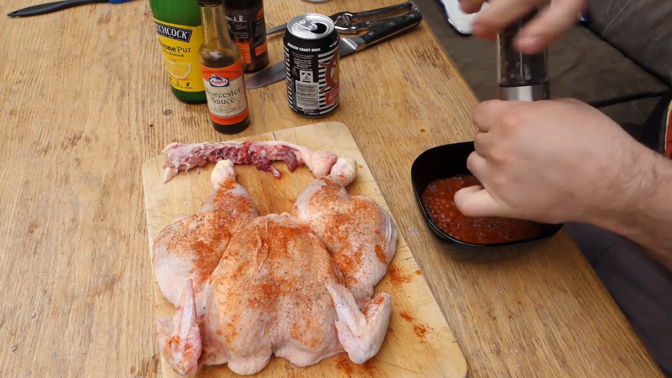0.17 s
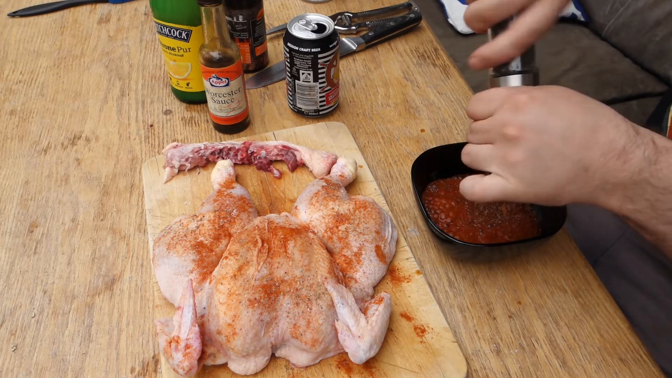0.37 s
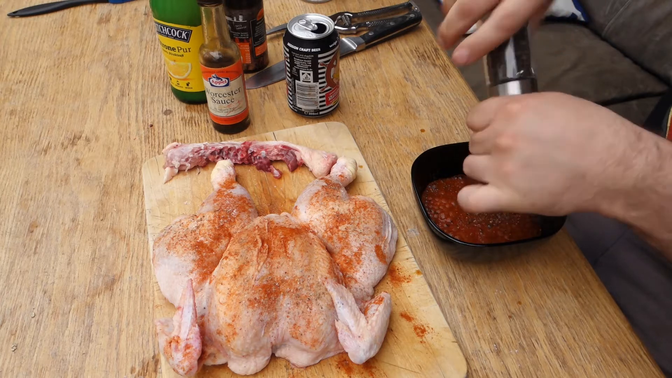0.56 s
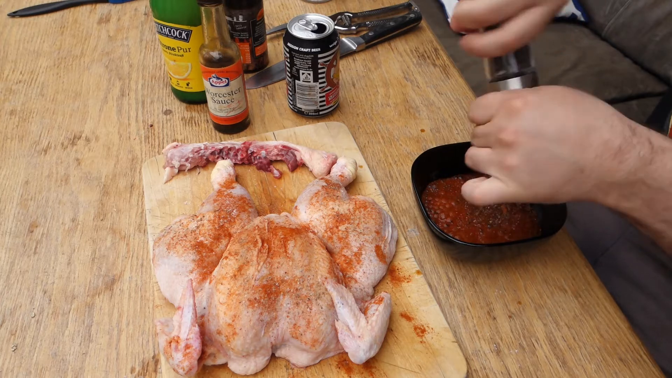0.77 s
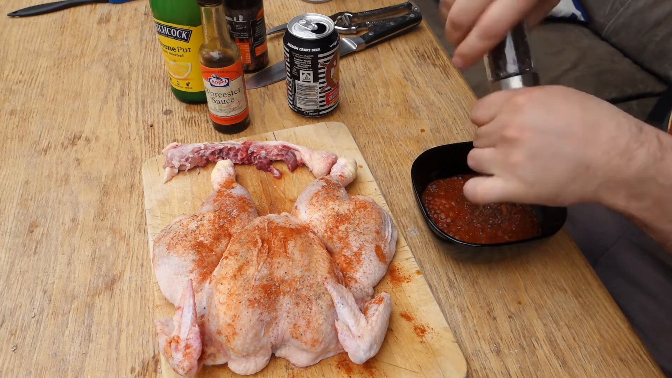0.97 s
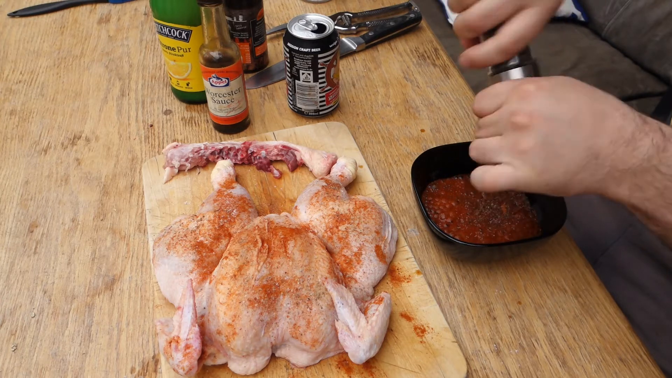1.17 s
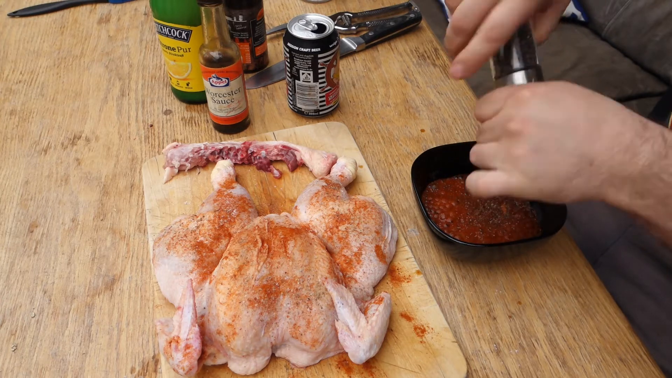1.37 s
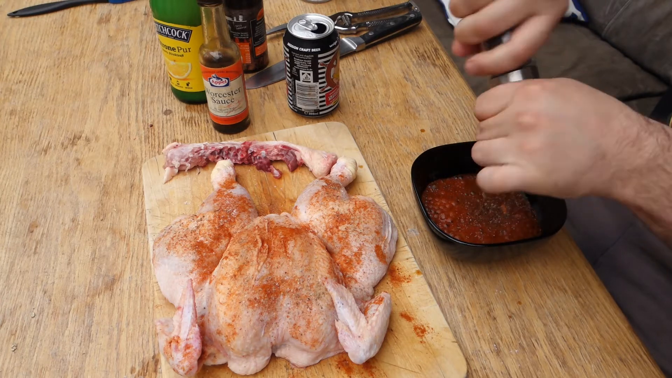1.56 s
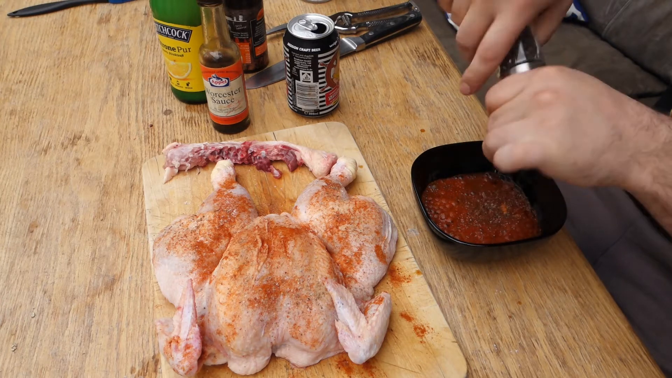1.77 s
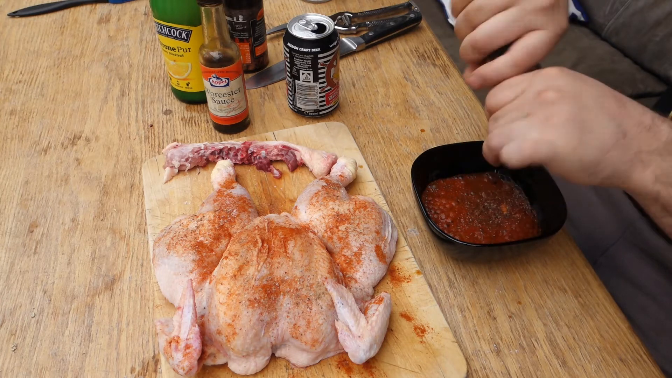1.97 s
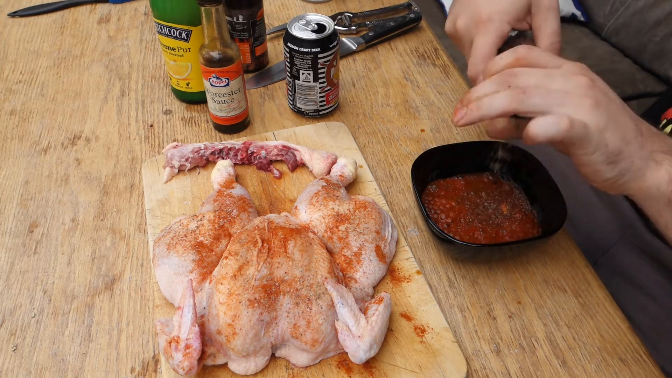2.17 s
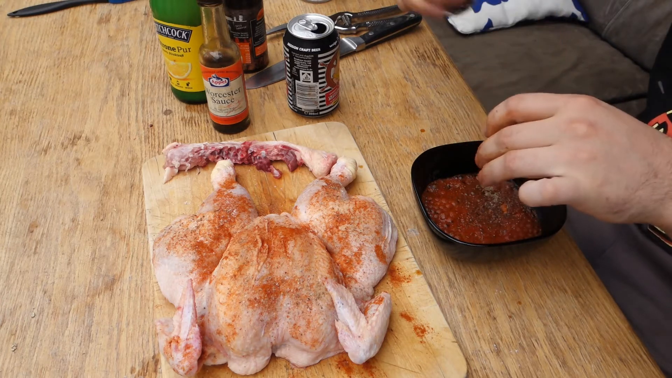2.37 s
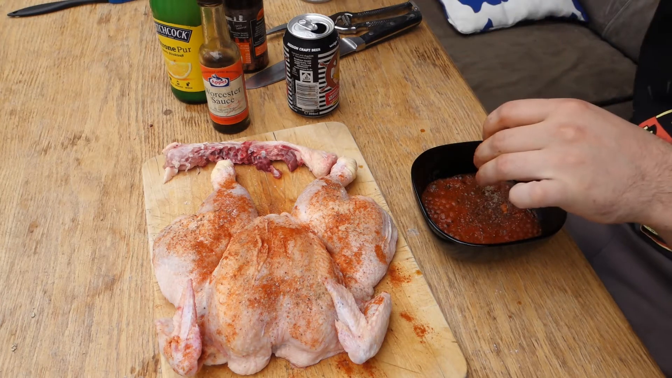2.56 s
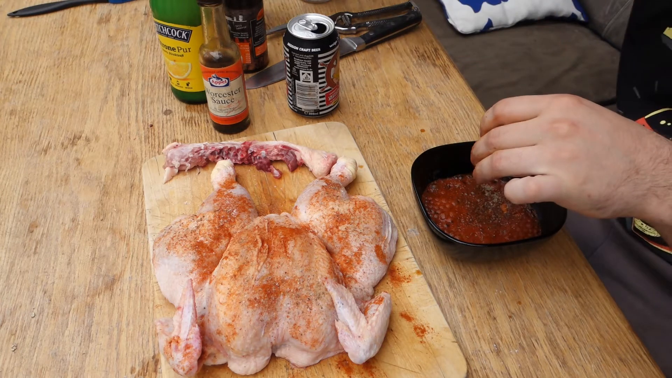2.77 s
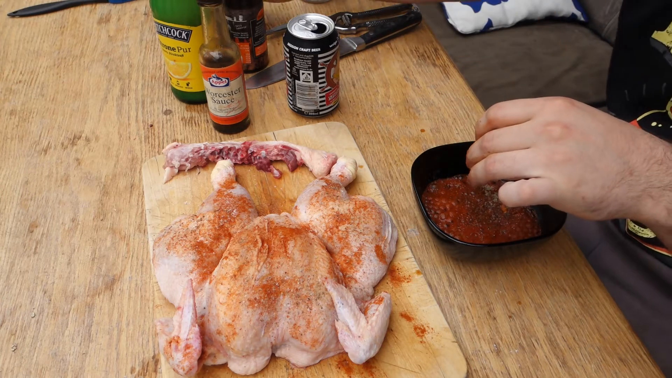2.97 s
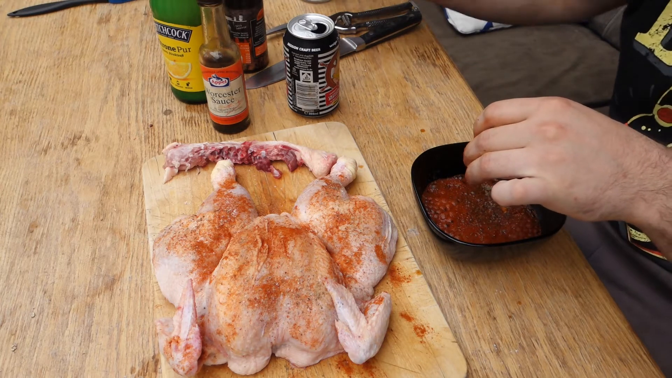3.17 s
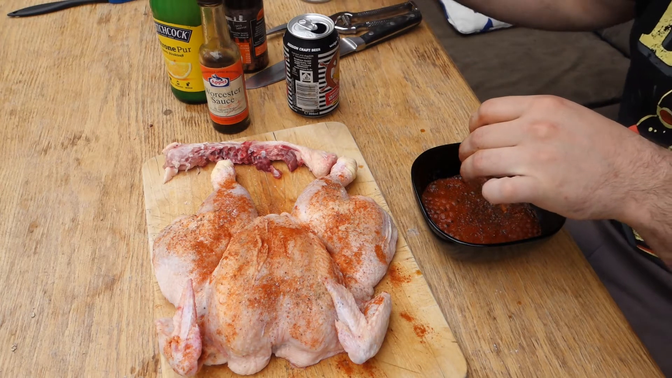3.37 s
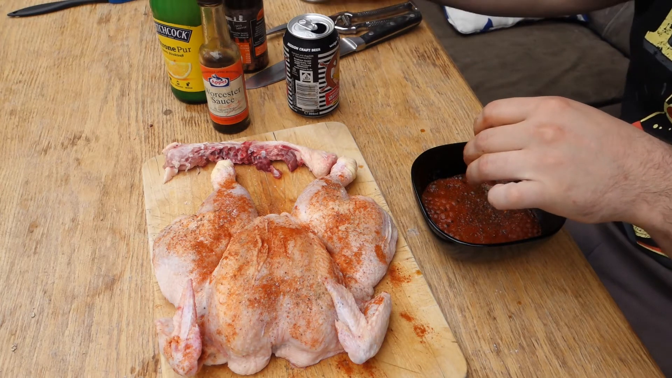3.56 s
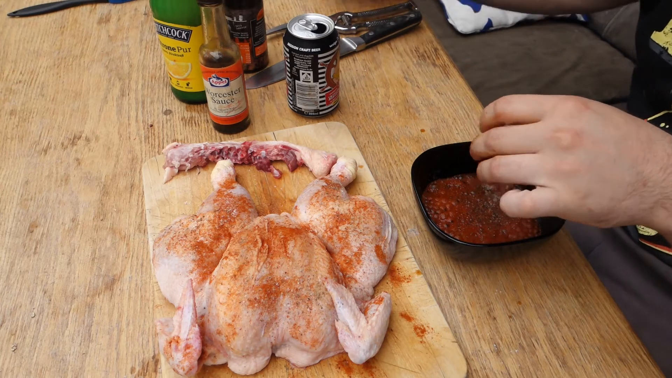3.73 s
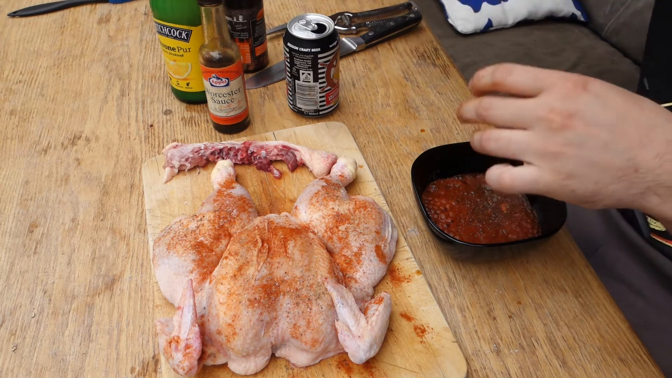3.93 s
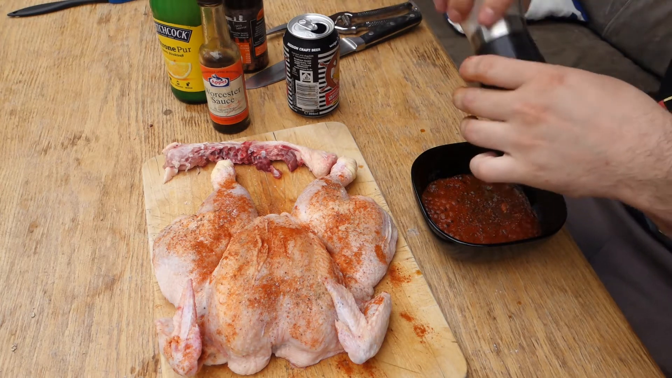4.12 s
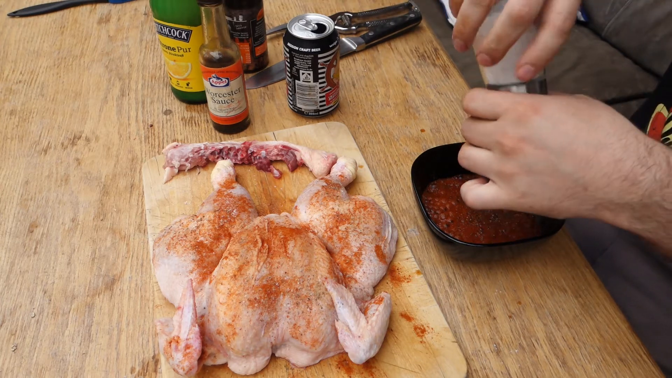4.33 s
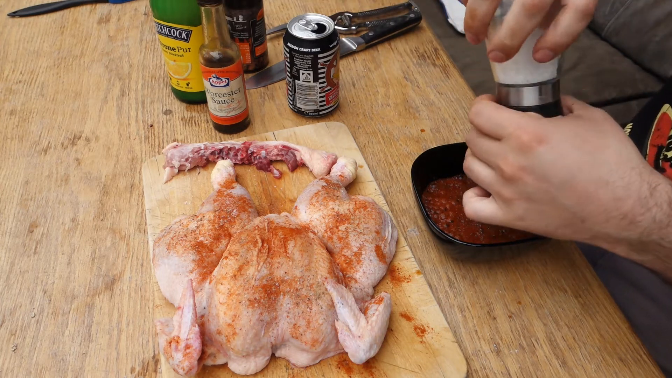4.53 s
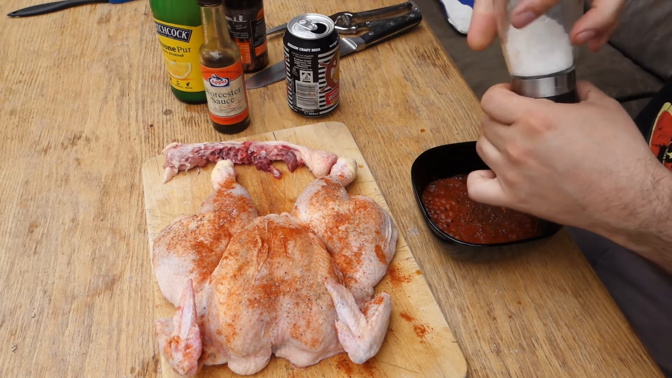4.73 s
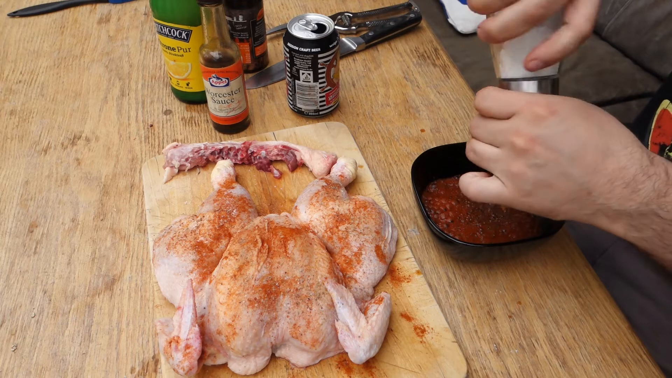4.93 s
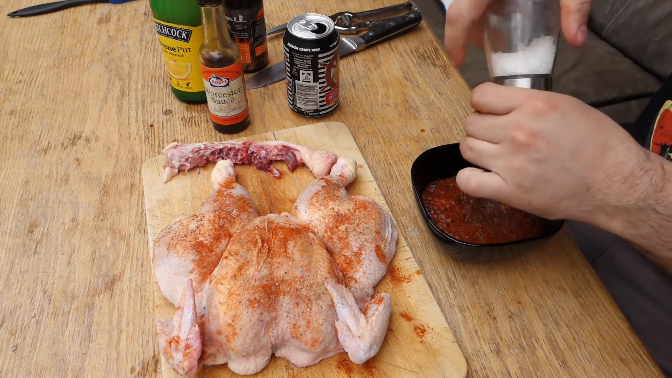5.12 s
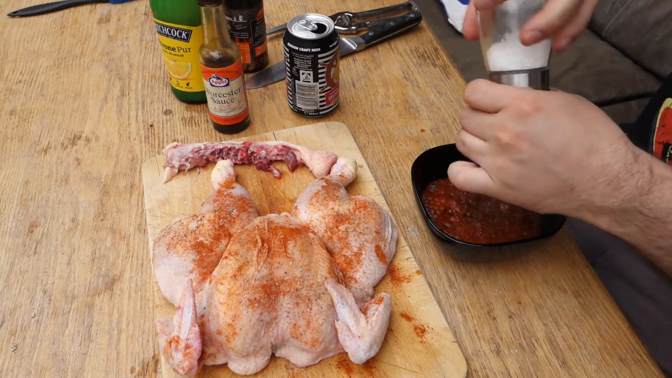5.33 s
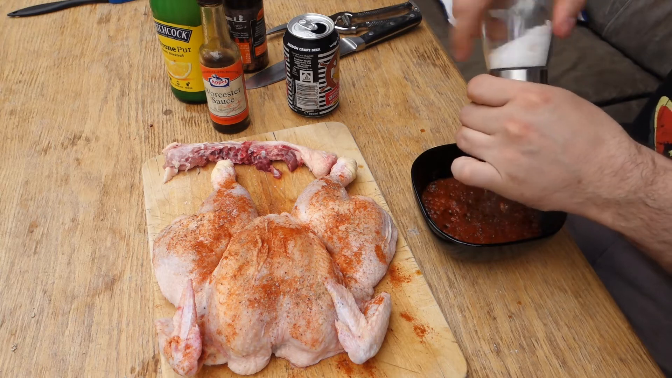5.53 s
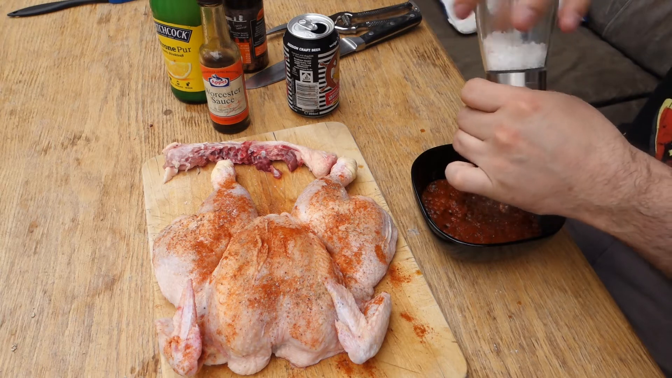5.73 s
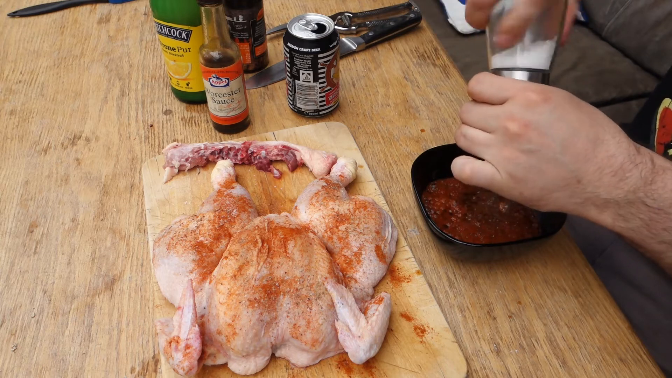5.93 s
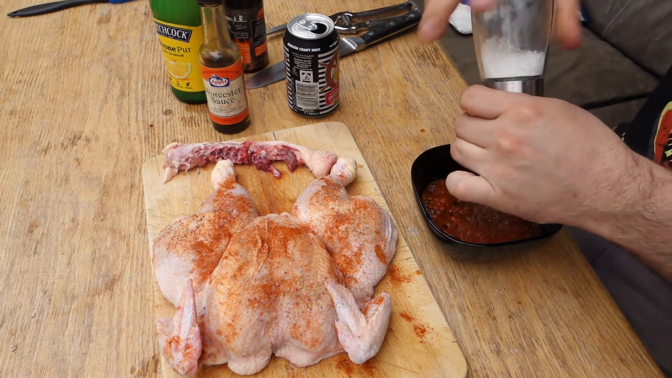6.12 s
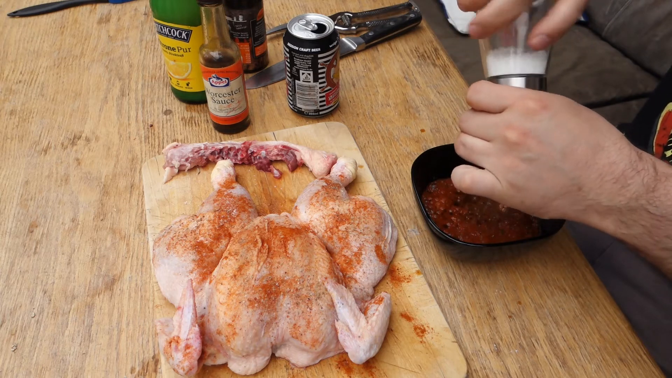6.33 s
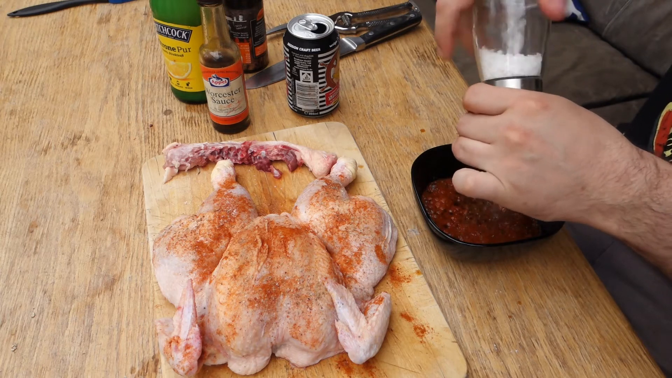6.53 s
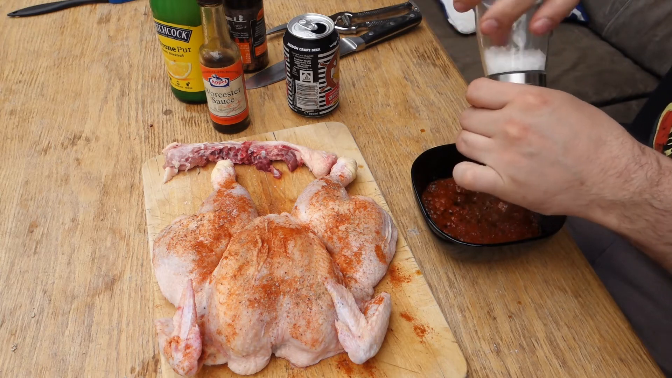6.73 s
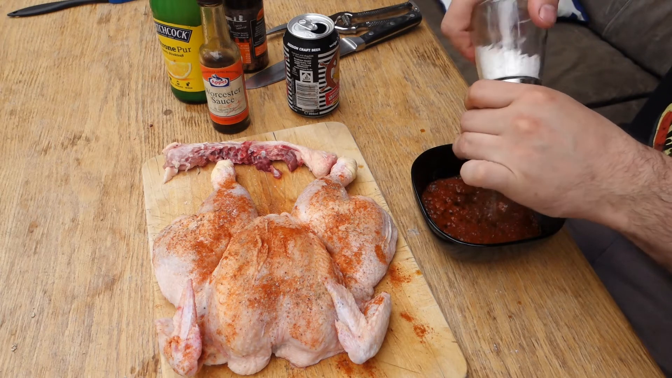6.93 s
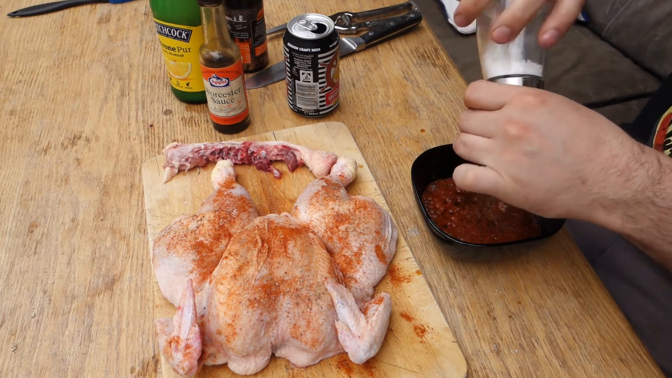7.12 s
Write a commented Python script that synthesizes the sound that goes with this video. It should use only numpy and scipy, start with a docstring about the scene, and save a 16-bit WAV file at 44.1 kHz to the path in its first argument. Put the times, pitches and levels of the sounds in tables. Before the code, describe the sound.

Close, dry grinding of peppercorns with glassy ticks, a cluster of wooden thuds, then heavier, crisper salt grinding in a small quiet room.

```python
"""Over steady hiss and a distant appliance's hum, a glass pepper mill is twisted by hand over a bowl, at right.
Its burr crushes corns (noise grains ringing resonances); loose corns tumble and tick on the glass; a room answers.
From 2.9 s a mill knocks on a wooden table: short noise puffs through the modes of table and foot.
From 3.9 s a salt mill slides, crunches and sings likewise; at 7.1 s it squeaks and the table is touched.
Table levels are relative: each source's gains and those of scene() come after."""
import sys
import numpy as np
from scipy import signal
from scipy.fft import rfft, irfft, next_fast_len
from scipy.io import wavfile
from scipy.ndimage import map_coordinates

SR = 44100
rng = np.random.default_rng(int(sys.argv[2]) if len(sys.argv) > 2 else 0)


def waveform_to_disk(signal):
    """Save audio, clipped to [-1, 1], as 16-bit WAV at the path in sys.argv[1]."""
    frames = np.transpose(np.atleast_2d(signal))
    scaled = np.clip(frames, -1, 1) * 32767
    samples = np.round(scaled).astype(np.int16)
    wavfile.write(sys.argv[1], SR, samples)


def gain_from_db(level_db):
    """Convert decibel levels to linear amplitude factors (20 dB per decade)."""
    decades = np.asarray(level_db, float) / 20
    return 10 ** decades


N = 317079  # samples


def along(points, hz):
    """Interpolates (Hz, value) points on a log frequency axis."""
    f, v = np.transpose(points)
    return np.interp(np.log(hz + 1), np.log(f + 1), v)


def filtered(x, response):
    """Applies a complex frequency response to x, zero-padded."""
    m = 2 * next_fast_len(N // 2 + SR // 4)
    return irfft(rfft(x, m) * response(np.fft.rfftfreq(m, 1 / SR)), m)[..., :N]


def above(hz, order):
    """Causal high-pass: equal one-pole sections in series."""
    return lambda f: (1j * f / (hz + 1j * f)) ** order


def modes(table):
    """Causal response of parallel resonances, alternating in sign."""
    def response(f):
        total = 0
        for k, (centre, width, db) in enumerate(table):
            resonance = 1j * f * width / (centre * centre - f * f + 1j * f * width)
            total = total + (-1) ** k * gain_from_db(db) * resonance
        return total
    return response


def colour(spectrum):
    """Causal minimum-phase response with the given spectrum, by folding the cepstrum."""
    def response(f):
        cepstrum = irfft(np.log(gain_from_db(along(spectrum, f)) + 1e-6))
        half = len(cepstrum) // 2
        cepstrum[1:half] *= 2
        cepstrum[half + 1:] = 0
        return np.exp(rfft(cepstrum))
    return response


def levelled(x, lo_hz, hi_hz):
    """Scales x to rms 1 within a band."""
    return x / np.std(filtered(x, lambda f: (f > lo_hz) & (f < hi_hz)))


def wobble(rate_hz):
    """Smooth random curve with rate_hz knots a second."""
    return map_coordinates(rng.standard_normal(N // 100), [np.arange(N) * rate_hz / SR])


def pair(alike, count):
    """Two noises whose correlation depends on frequency."""
    turn = lambda f: np.arccos(np.clip(along(alike, f), -1, 1)) / 2
    mid_side = lambda f: [np.cos(turn(f)), np.sin(turn(f))]
    mid, side = filtered(rng.standard_normal((2, N)), mid_side)
    return np.array([mid + side, mid - side])[:, :count]


def grains(rate_hz, spread_db, dust):
    """Random impacts, a few much larger than the rest, over fine dust noise."""
    when, size, fine = rng.random(N), rng.exponential(size=N), rng.standard_normal(N)
    hits = (when < rate_hz / SR) * gain_from_db(spread_db * np.minimum(size, 3.1)) * np.sign(fine)
    return hits / np.std(hits) + dust * rng.standard_normal(N)


def crushed(table, lo_hz, hi_hz, rate_hz, spread_db, dust, sway_db, sway_hz):
    """Grains ring resonances; as the grains shift, each resonance swells and fades on its own."""
    hits = grains(rate_hz, spread_db, dust)
    rings = 0
    for k, mode in enumerate(table):
        swaying = hits * gain_from_db(sway_db * wobble(sway_hz))
        rings = rings + (-1) ** k * filtered(swaying, modes([mode]))
    return levelled(rings, lo_hz, hi_hz)


def strokes(rows, peak_db, swell_db, shape):
    """Gain per sample: each stroke sets in, swells to its peak, holds, is released and trickles out.

    shape: (attack [dB/s], release [dB/s], trickle against peak [dB], trickle release [dB/s])."""
    attack, release, trickle_db, fade = shape
    start, climb, hold = np.transpose(rows)[:3, :, None]
    peak_db, swell_db = np.reshape(peak_db, (-1, 1)), np.reshape(swell_db, (-1, 1))
    t = np.arange(0, N + 32, 32) / SR
    rise = np.clip((t - start) / np.maximum(climb, 1e-3), 0, 1)
    late = np.maximum(t - start - climb - hold, 0)
    level = peak_db - swell_db * (1 - rise) - attack * np.maximum(start - t, 0)
    tail = gain_from_db(-release * late) + gain_from_db(trickle_db - fade * late)
    gain = (gain_from_db(level) * tail).sum(axis=0)
    return np.interp(np.arange(N) / SR, t, gain)


def twisted(twists, shape, *stirs):
    """Gains of the crunch, then of each stirred layer: (level against crunch [dB], share of its swell)."""
    peak_db, swell_db = np.transpose(twists)[3:5]
    return [strokes(twists, peak_db + db, share * swell_db, shape) for db, share in [(0, 1), *stirs]]


def bursts(times, levels_db, t60, count, hz=0, ring=0):
    """A short decaying puff at each time: noise plus a share of sine at the given pitches."""
    t = np.arange(count) / SR
    tone = np.sin(2 * np.pi * np.outer(hz, t))
    puffs = (rng.standard_normal((len(times), count)) + ring * tone) * gain_from_db(-60 * t / t60)
    puffs *= gain_from_db(levels_db)[:, None] / np.abs(puffs).max(axis=1, keepdims=True)
    at = np.round(times[:, None] * SR).astype(int) + np.arange(count)
    return np.bincount(at.ravel(), puffs.ravel(), N + count)[:N]


def vary(hz, times, share):
    """One pitch per event, scattered by a relative share."""
    return hz * (1 + share * rng.standard_normal(len(times)))


def struck(puffs, response, gain_db):
    """Puffs through a response scaled to impulse energy 1, then a gain."""
    f = np.fft.rfftfreq(8192, 1 / SR)
    return gain_from_db(gain_db) * filtered(puffs, response) / np.sqrt(np.mean(np.abs(response(f)) ** 2))


# hiss and rumble spectrum: (frequency [Hz], density [dB])
HISS_SPECTRUM = [(24, -63), (40, -16.5), (214, -13), (431, -8), (464, -9), (582, -7), (643, 0), (868, -4),
                 (935, 1), (1010, -6), (1580, -3), (2670, -11), (3610, -11.5), (4880, -14.5), (15800, -18)]
# left-right correlation: (frequency [Hz], correlation [1])
HISS_ALIKE = [(60, 0.51), (180, 0.91), (550, 0.24), (1650, 0.046), (4970, 0.023), (15000, 0.27)]


def hiss():
    """Steady microphone hiss and room rumble: shaped, partly correlated stereo noise."""
    noise = filtered(pair(HISS_ALIKE, count=N), lambda f: gain_from_db(along(HISS_SPECTRUM, f)))
    return gain_from_db(-63) * noise / np.std(noise.mean(axis=0))


# drone bands: (centre [Hz], width [Hz], level [dB])
HUM_MODES = [(793.4, 36, 3), (1657, 37, 2), (2350, 122, -6.5), (3794, 99, -15.5)]


def appliance_hum():
    """A far appliance drones: noise through a few narrow resonances."""
    return gain_from_db(-76) * levelled(filtered(rng.standard_normal(N), modes(HUM_MODES)), 700, 784.0)


# levelling bands of body, grit, glass, rim, cup: (low [Hz], high [Hz])
PEPPER_LEVEL_BANDS = [(1000, 3200), (10300, 14000), (6200, 7600), (14900, 15800), (600, 1400)]
# resonances of body, hollow under the burr, glass wall, rim: (centre [Hz], width [Hz], level [dB])
PEPPER_BODY_MODES = [(1940, 347, 11), (2640, 620, -5.5)]
PEPPER_CUP_MODES = [(713, 390, -0.5), (1210, 530, -1)]
PEPPER_GLASS_MODES = [(6850, 350, 11.5), (7700, 1130, -3.5), (12500, 430, -13)]
PEPPER_RIM_MODES = [(9260, 200, 0), (15400, 350, 0)]
# grit spectrum: (frequency [Hz], density [dB])
PEPPER_GRIT_SPECTRUM = [(1530, -42), (2600, 0), (3140, -26), (4000, -4.5), (6100, -3.5), (7210, -10.5),
                        (8700, 2.5), (9670, -8), (11200, -8.5), (15100, -9.5), (15800, -35)]
# burr twists: (bite [s], climb [s], hold [s], crunch peak [dB], swell from bite to peak [dB],
# glass against crunch [dB], grit against crunch [dB])
PEPPER_TURNS = [(0, 0.0031, 0.0063, -34, -12, -5.5, -13.5), (.344, 0.059, 0.023, -35, 6, -16, -16.5),
                (.767, 0.039, 0.046, -34, 11, -12.5, -15), (.935, 0.028, 0.019, -46, 18, -12, -17),
                (1.12, 0.014, 0.014, -43.5, 8, -18, -12), (1.175, 0.035, 0.05, -34, 7, -19.5, -17.5),
                (1.33, 0.018, 0.011, -54, -1, -2, -12), (1.545, .04, 0.038, -40.5, 8, -35, -21),
                (1.605, 0.007, 0.046, -33, 27, -15, -18), (1.75, 0.011, 0.016, -55, 8, -13, -25),
                (1.925, 0.018, 0.0083, -46.5, 21, -16, -14), (1.957, 0.01, 0.02, -40.5, 4, -20, -22),
                (1.989, 0.0085, 0.06, -34.5, 4, -7.5, -14.5), (2.08, 0.0037, 0.013, -43.5, 3, -17, -9)]
# cup against crunch, twist by twist: (level [dB])
PEPPER_CUP_LEVELS = [-16, -21, -8.5, -8.5, -10, -14, 1.5, -3, -16, -22, -15, -23, -14, -10]
# corns tumble as the mill turns back or tips:
# (start [s], climb [s], hold [s], glass wall level [dB], rim level [dB])
CORN_TUMBLES = [(0.193, 0.045, 0.033, -36, -44.5), (0.302, 0.022, 0.0099, -59, -72),
                (0.52, .02, 0.062, -52, -57), (0.631, 0.029, 0.03, -32.5, -43),
                (1.044, 0.044, 0.013, -34, -41), (1.455, 0.044, 0.013, -32, -44),
                (1.8, 0.018, 0.029, -62, -66), (1.879, 0.039, 0.008, -40, -47),
                (2.35, 0.038, 0.034, -60, -62), (2.404, 0.046, 0.012, -41, -36),
                (2.58, .012, 0.084, -59, -68)]


def pepper_mill():
    """Corns crack in the burr and ring the body; on the back stroke they tumble on glass wall and rim."""
    body_band, grit_band, glass_band, rim_band, cup_band = PEPPER_LEVEL_BANDS
    twist_shape, tumble_shape = (3000, 423, -14, 98), (600, 270, -37, 80)
    tumble_swell_db, tipped_s, upright_rim_db = 24, 2.3, -24

    glass_db, grit_db = np.transpose(PEPPER_TURNS)[5:]
    crunch, grit, stirred, rung, hollow = twisted(
        PEPPER_TURNS, twist_shape,
        (grit_db, -0.066), (glass_db, -0.1), (-22, 0.1), (PEPPER_CUP_LEVELS, 0.8))
    wall_db, rim_db = np.transpose(CORN_TUMBLES)[3:]
    loose = strokes(CORN_TUMBLES, wall_db, tumble_swell_db, tumble_shape)
    tipped = strokes(CORN_TUMBLES, rim_db, tumble_swell_db, tumble_shape)
    crunch = crunch + gain_from_db(-22) * tipped
    grit = grit + gain_from_db(-23.5) * tipped

    body = crushed(PEPPER_BODY_MODES, *body_band, rate_hz=900, spread_db=3.5, dust=0.73,
                   sway_db=2.5, sway_hz=61)
    cup = crushed(PEPPER_CUP_MODES, *cup_band, rate_hz=600, spread_db=2.5, dust=0.57,
                  sway_db=7.5, sway_hz=43)
    fine = grains(2510, spread_db=7.5, dust=1.0)
    fine = levelled(filtered(fine, colour(PEPPER_GRIT_SPECTRUM)), *grit_band)
    corns = grains(450, spread_db=5.0, dust=0.8)
    glass = levelled(filtered(corns, modes(PEPPER_GLASS_MODES)), *glass_band)
    # corns reach the rim's lower mode in full only once the mill is tipped over
    low, high = (filtered(corns, modes([mode])) for mode in PEPPER_RIM_MODES)
    low_gain = np.where(np.arange(N) < tipped_s * SR, gain_from_db(upright_rim_db), 1)
    rim = levelled(low_gain * low - high, *rim_band)
    return crunch * body + hollow * cup + grit * fine + (stirred + loose) * glass + (rung + tipped) * rim


# decay time: (frequency [Hz], t60 [s])
ROOM_DECAY = [(150, 0.33), (500, 0.24), (1200, 0.31), (2500, 0.33), (8000, 0.31), (15000, 0.4)]
# left-right correlation of the tail: (frequency [Hz], correlation [1])
TAIL_ALIKE = [(200, 1), (700, 0.97), (1500, 0.59), (3000, 0.49), (6000, 0.046), (14000, 0.18)]


def room(x, step_s=0.3):
    """Reverberation by decaying noise; the hands keep moving, so each step has a new tail."""
    out, hop, size = np.zeros((2, N + 2 * SR)), round(step_s * SR), SR // 2
    delay = 200  # samples
    noise = pair(TAIL_ALIKE, count=N)
    for a in range(0, N, hop):
        hz, t, z = signal.stft(np.roll(noise, -a, axis=1)[:, :size], SR, nperseg=256)
        decay = gain_from_db(-60 * t / along(ROOM_DECAY, hz)[:, None])
        tail = signal.istft(z * decay, SR, nperseg=256)[1]
        wet = signal.fftconvolve(x[None, a:a + hop], tail / np.linalg.norm(tail[0]), axes=1)
        out[:, a + delay:a + delay + wet.shape[1]] += wet
    return out[:, :N]


# spectrum of a bright tick: (frequency [Hz], density [dB])
TICK_SPECTRUM = [(1500, -17.5), (3500, -9.5), (6800, 0.5), (11000, -12), (16000, -9.5)]
# single grains on the glass: (time [s], peak [dB])
GLASS_TICKS = [(.2344, -40.5), (.276, -32), (.3273, -33), (.3305, -43), (.334, -42), (.4894, -38),
               (.565, -38.5), (.6435, -30.5), (1.0651, -34), (1.0905, -27), (1.1228, -27), (1.4833, -39),
               (1.875, -38), (1.9215, -37), (2.231, -58), (2.361, -48.5), (2.413, -52), (2.589, -38),
               (2.6248, -39), (2.671, -45), (4.102, -37.5), (4.117, -25), (4.155, -36), (4.1702, -39),
               (4.185, -39), (4.2075, -27.5), (4.44, -36), (4.608, -34.5), (4.6349, -39), (5.238, -54.5),
               (6.7234, -34), (6.9913, -34)]


def glass_ticks():
    """Single grains tick on the glass: short ringing puffs near 7.2 kHz."""
    s, db = np.transpose(GLASS_TICKS)
    ticks = bursts(s, db, t60=0.013, count=500, hz=vary(7200, s, 0.066), ring=0.98)
    return struck(ticks, colour(TICK_SPECTRUM), gain_db=3.0)


def crunch_body(puffs):
    """Crunches pass a broad resonance twice."""
    return gain_from_db(4.0) * filtered(puffs, lambda f: modes([(2000, 3000, 0)])(f) ** 2)


# large grains crack in the burr: (time [s], bright tick level [dB], lower crunch level [dB])
BURR_CRACKS = [(0.3445, -15.5, -37), (0.3482, -18, -26), (0.7672, -17.5, -38), (0.7703, -17, -28),
               (0.803, -26, -28), (1.1758, -27, -37), (1.2052, -21.5, -12.5), (1.2507, -40, -14),
               (1.6112, -17, -16), (1.643, -45, -19), (1.9661, -28, -18), (1.9887, -20.5, -18),
               (2.012, -35, -22), (2.028, -22, -23), (1.9955, -24, -21), (2.047, -20.5, -34),
               (2.0805, -17.5, -28), (2.094, -30, -24), (4.8556, -28, -40), (4.8916, -23, -50),
               (4.9161, -14, -20), (4.9295, -17, -21), (4.965, -36, -9.5), (4.9756, -13, -22),
               (5.38, -42, -28), (5.3965, -35, -34), (5.4103, -36, -35), (5.431, -19, -27),
               (5.5159, -30, -14), (5.536, -23, -12), (5.8567, -28, -42), (5.9487, -30, -24),
               (5.9681, -34, -6.5), (6.3205, -29, -48), (6.327, -23, -24), (6.376, -46.5, -10),
               (6.3879, -34.5, -13), (6.4264, -34, -13), (6.781, -33.5, -14), (6.809, -44, -12),
               (6.8369, -40, -10), (6.8447, -37, -13), (6.86, -34, -16), (6.888, -38, -9.5),
               (7.0144, -50, -28)]


def burr_cracks():
    """Large grains crack in the burr: a bright tick plus a short lower crunch."""
    s, tick_db, crunch_db = np.transpose(BURR_CRACKS)
    swap_s, pepper_burr_hz, salt_burr_hz = 3.5, 8200, 5614  # the salt mill takes over at swap_s
    burr_hz = np.where(s < swap_s, pepper_burr_hz, salt_burr_hz)
    ticks = bursts(s, tick_db, t60=0.0075, count=500, hz=vary(burr_hz, s, 0.078), ring=0.97)
    crunch = bursts(s, crunch_db, t60=0.017, count=900, hz=vary(1907, s, 0.041), ring=1.62)
    return struck(ticks, colour(TICK_SPECTRUM), gain_db=3.0) + crunch_body(crunch)


# hollow cracks: (time [s], peak [dB])
HOLLOW_POPS = [(1.3396, -26), (1.5422, -35), (5.0095, -6), (5.3227, -30), (6.9993, -26)]


def hollow_pops():
    """Hollow cracks: strongly pitched puffs near 1 kHz."""
    s, db = np.transpose(HOLLOW_POPS)
    return crunch_body(bursts(s, db, t60=0.017, count=900, hz=vary(1010, s, 0.062), ring=3.4))


# the collar takes up slack: (time [s], peak [dB])
COLLAR_CATCHES = [(1.935, -38), (4.8245, -22), (5.826, -32), (6.273, -22), (6.7341, -24)]
# spectrum of that click: (frequency [Hz], density [dB])
CATCH_SPECTRUM = [(400, -15.5), (900, -3.5), (2000, 4.5), (4500, -7.5), (6000, -17.5), (15000, -25)]


def collar_catches():
    """The collar takes up slack with a dry click: a short coloured noise puff."""
    s, db = np.transpose(COLLAR_CATCHES)
    return struck(bursts(s, db, t60=0.0088, count=400), colour(CATCH_SPECTRUM), gain_db=4.5)


# the foot meets the table:
# (time [s], thud [dB], clack [dB], edge [dB], mean edge pitch [Hz], time between rocks [s])
FOOT_LANDINGS = [(2.932, -14, -15, -19.5, 1610, 0.007), (2.951, -20.5, -19, -18.5, 2440, 0.0081),
                 (2.972, -18.5, -23, -24, 1880, .008), (2.989, -19.5, -26, -19, 2260, .015),
                 (3.1, -28, -37, -45, 1700, .012), (3.131, -18, -35, -22.5, 2260, 0.011),
                 (3.192, -17.5, -34, -36, 2160, 0.01), (3.227, -18.5, -28.5, -31, 2130, .012),
                 (3.6, -54.5, -62, -69, 2020, 0.014), (7.121, -41.5, -50, -50.5, 2000, 0.023)]
# loss per rock of thud, clack, edge: (loss [dB])
ROCK_LOSSES = (3.5, 1.5, 7)
# resonances of table top and mill foot: (centre [Hz], width [Hz], level [dB])
TABLE_MODES = [(140, 45, -9), (288, 108, -11), (427, 106, -3), (536, 97, -1.5), (682, 98, -5.5)]
FOOT_MODES = [(829, 75, -5.5), (1030, 184, -7.5), (1250, 250, -11)]
# spectrum of the dry edge: (frequency [Hz], density [dB])
EDGE_SPECTRUM = [(150, -29), (900, 5.5), (1550, 8), (1850, 6.5), (2200, 1), (2550, 2), (3000, -5.5),
                 (3500, -14), (4400, -16), (8000, -39), (16000, -52)]


def table_knocks():
    """The table top booms under each contact, the mill's foot clacks, with a dry edge on top."""
    lands, *levels, ring_hz, gap = np.transpose(FOOT_LANDINGS)[..., None]
    rock = np.arange(3)  # each landing rocks twice more
    s = (lands + gap * rock).ravel()
    thud_db, clack_db, edge_db = ((db - loss * rock).ravel() for db, loss in zip(levels, ROCK_LOSSES))
    edge_hz = vary((ring_hz + 0 * rock).ravel(), s, 0.047)
    soft_contact = lambda f: modes(TABLE_MODES)(f) / (1 + 1j * f / 1490) ** 2
    thud = struck(bursts(s, thud_db, t60=0.015, count=1500), soft_contact, gain_db=12.5)
    clack = struck(bursts(s, clack_db, t60=0.025, count=1500), modes(FOOT_MODES), gain_db=10.5)
    edge = bursts(s, edge_db, t60=0.028, count=2500, hz=edge_hz, ring=0.31)
    edge = struck(edge, colour(EDGE_SPECTRUM), gain_db=10.5)
    return filtered(thud + clack + edge, above(120, order=4))  # the top radiates no deep bass


# levelling bands of body, grit, glass, cup: (low [Hz], high [Hz])
SALT_LEVEL_BANDS = [(1500, 4000), (5000, 8500), (13700, 14300), (600, 1300)]
# resonances of body, cup, neck, glass: (centre [Hz], width [Hz], level [dB])
SALT_BODY_MODES = [(1570, 750, -6), (1984, 197, 3.5), (2320, 350, -4.5), (2960, 285, -2), (3470, 270, -2.5),
                   (4540, 1050, -10.5)]
SALT_CUP_MODES = [(650, 490, -15.5), (1117, 450, 4)]
SALT_NECK_MODES = [(5770, 270, 1.5), (6750, 290, -17), (7800, 710, 2), (11750, 340, 5)]
SALT_GLASS_MODES = [(6800, 300, -16), (9630, 120, -4), (14000, 90, 0)]
# grit spectrum: (frequency [Hz], density [dB])
SALT_GRIT_SPECTRUM = [(1200, -49), (2000, -10), (3200, -18), (4200, -5), (4800, -14), (5300, -2.5),
                      (6600, 4.5), (8000, -4.5), (10000, -8.5), (12500, -4), (15800, -8.5)]
# burr twists: (bite [s], climb [s], hold [s], crunch peak [dB], swell from bite to peak [dB],
# cup against crunch [dB], grit against crunch [dB])
SALT_TURNS = [(4.831, 0.086, 0.021, -24, 29.5, -10.5, -11.5), (4.964, 0.037, 0.028, -25, 7.4, -2, -12.5),
              (5.405, 0.14, 0.0097, -26.5, 8.7, -5, -9.5), (5.823, 0.14, 0.027, -23.5, 22.5, -7.5, -14),
              (6.326, 0.035, 0.089, -28, 6.8, -8, -12.5), (6.745, 0.099, 0.033, -27, 16.65, -4, -12),
              (6.98, .02, .012, -56.5, 4, 3, 0.5), (7.14, 0.061, .01, -40, 40, 5.5, 1.5)]
# salt slides in the lifted mill: (start [s], climb [s], hold [s], grit level [dB], swell [dB])
SALT_SLIDES = [(3.956, 0.14, 0.0054, -54.5, 23), (4.107, 0.01, 0.1, -43.5, 4),
               (4.435, .002, 0.0032, -53, 10), (4.593, 0.021, 0.006, -56, 13)]
# a few crystals slip and the glass sings: (start [s], climb [s], hold [s], level [dB])
CRYSTAL_SLIPS = [(3.955, 0.032, 0.13, -57), (4.4, 0.056, .012, -57), (4.589, 0.023, 0.011, -57.5),
                 (4.726, .03, .012, -63.5), (5.08, 0.046, 0.11, -54.5), (5.308, 0.043, 0.0083, -52),
                 (5.56, 0.0158, .1, -49.5), (5.783, 0.031, .005, -52.5), (6.027, 0.074, 0.0113, -46.5),
                 (6.23, 0.031, 0.0079, -52.5), (6.496, 0.064, 0.011, -46), (6.906, 0.075, 0.035, -50.5),
                 (7.033, .03, 0.032, -60)]


def salt_mill():
    """Crystals shatter in the burr, ringing body and cup; slipping salt makes the glass sing sharp tones."""
    body_band, grit_band, glass_band, cup_band = SALT_LEVEL_BANDS
    twist_shape, slide_shape = (2500, 402, -14.5, 118), (2496, 262, -9.5, 87)
    slip_shape, slip_swell_db = (696.5, 293, -31.5, 149), 8.5

    cup_db, grit_db = np.transpose(SALT_TURNS)[5:]
    crunch, grit, stirred, hollow = twisted(
        SALT_TURNS, twist_shape, (grit_db, 0.71), (-27, 0.57), (cup_db, 1.3))
    slide = strokes(SALT_SLIDES, *np.transpose(SALT_SLIDES)[3:], slide_shape)
    slips = strokes(CRYSTAL_SLIPS, np.transpose(CRYSTAL_SLIPS)[3], slip_swell_db, slip_shape)
    crunch = crunch + gain_from_db(-15) * slide
    grit = grit + slide
    hollow = hollow + gain_from_db(-28) * slide
    tumble = stirred + gain_from_db(-11) * slide + slips

    body = crushed(SALT_BODY_MODES, *body_band, rate_hz=500, spread_db=3.0, dust=0.73,
                   sway_db=2.5, sway_hz=90)
    cup = crushed(SALT_CUP_MODES, *cup_band, rate_hz=500, spread_db=7.0, dust=0.72,
                  sway_db=1.5, sway_hz=27)
    fine = grains(1500, spread_db=4.5, dust=0.71)
    fine = levelled(filtered(fine, colour(SALT_GRIT_SPECTRUM)), *grit_band)
    neck = crushed(SALT_NECK_MODES, *grit_band, rate_hz=500, spread_db=8.0, dust=0.64,
                   sway_db=3.5, sway_hz=49)
    crystals = grains(400, spread_db=0.5, dust=0.63)
    glass = levelled(filtered(crystals, modes(SALT_GLASS_MODES)), *glass_band)
    # the glass tone is turned down wherever the salt grit is loud against it
    glass_share = tumble ** 2 / (tumble ** 2 + (gain_from_db(-10) * grit) ** 2 + 1e-20)
    ground = crunch * body + hollow * cup + grit * fine
    return ground + gain_from_db(-5.5) * slide * neck + glass_share * tumble * glass


# the salt mill's collar rubs: (time [s], mean pitch [Hz], mean level [dB])
COLLAR_SQUEAK = [(7.12, 2000, -79), (7.146, 2090, -47.5), (7.175, 2080, -43.5), (7.19, 2200, -56)]


def collar_squeak():
    """A brief rubbing tone: a sine unsteady in pitch and level."""
    s, hz, db = np.transpose(COLLAR_SQUEAK)
    t = np.arange(N) / SR
    phase = 2 * np.pi * np.cumsum(np.interp(t, s, hz) + 110 * wobble(300)) / SR
    level_db = np.interp(t, s, db, -120) + 4.5 * wobble(250)
    return gain_from_db(level_db) * np.sqrt(2) * np.sin(phase)


# level difference of the mills: (frequency [Hz], left minus right [dB])
MILL_BALANCE = [(60, -1.0), (130, 8), (290, -0.5), (640, -2), (1410, -2.5), (3100, -8), (6820, -13.5),
                (15000, -4.5)]
# phase difference of the mills: (frequency [Hz], left lead [rad])
MILL_PHASE = [(0, 0), (2070, -0.0), (2930, -1.1), (3530, -1.3), (5080, -1.43), (6890, -0.78), (8100, -1.2),
              (10800, -0.39), (16700, -0.0)]
# how much of the mills reaches the walls: (frequency [Hz], level [dB])
WALL_SEND = [(300, -10), (1500, -11), (4000, -8.5), (12000, -9)]


def ports(f):
    """Left and right responses to the mills: at right, so left is shaded in the treble and a touch late."""
    level = gain_from_db(np.outer([0.5, -0.5], along(MILL_BALANCE, f)))
    return level * np.exp(np.outer([0.5j, -0.5j], along(MILL_PHASE, f)))


def scene():
    """Mills at right, table in the middle, both answered by the room, over hiss and hum."""
    backdrop = hiss() + appliance_hum()
    snaps = glass_ticks() + burr_cracks() + hollow_pops() + collar_catches()
    mills = pepper_mill() + snaps + salt_mill() + collar_squeak()
    mills = filtered(mills, above(330, order=3))  # too small to radiate bass
    table = table_knocks()
    wet = room(filtered(mills, colour(WALL_SEND)) + gain_from_db(-3.5) * table)
    return gain_from_db(-4.5) * filtered(mills, ports) + gain_from_db(-5.5) * table + wet + backdrop


def roll_off(x):
    """The treble ends steeply here."""
    return signal.sosfilt(signal.butter(12, 17120, fs=SR, output="sos"), x)


def record(dry):
    """Bass is cut below 130 Hz; the band ends near 15.9 kHz, with 48 dB less above."""
    top_hz, top_db = 15900, -48
    response = lambda f: above(130, order=3)(f) * np.where(f < top_hz, 1, gain_from_db(top_db))
    cut = filtered(dry, response)
    return roll_off(cut)


dry = scene()
out = record(dry)
waveform_to_disk(out)
```